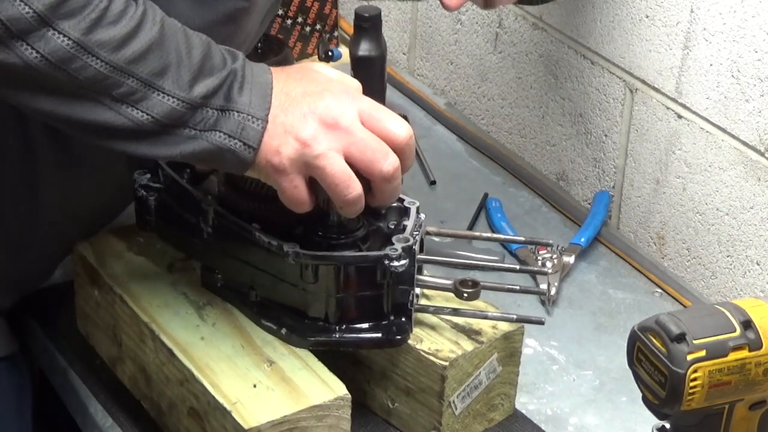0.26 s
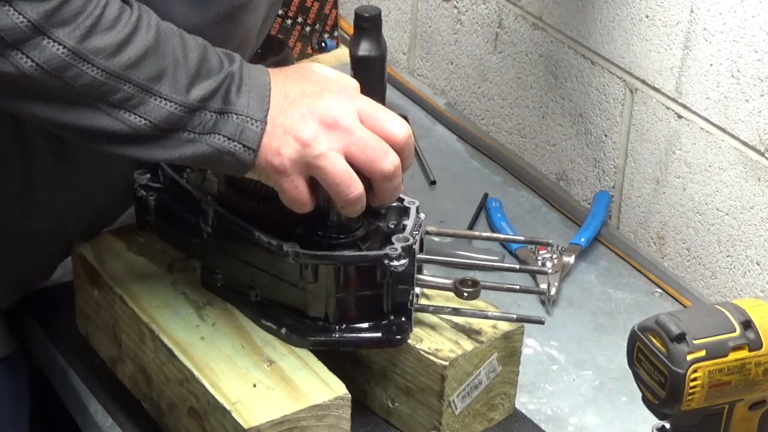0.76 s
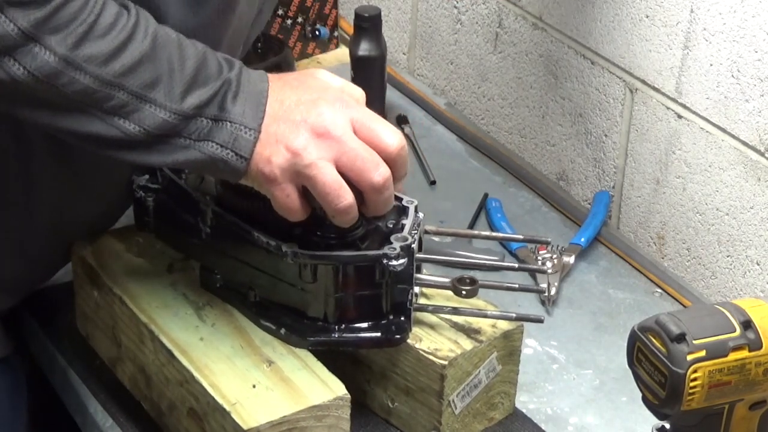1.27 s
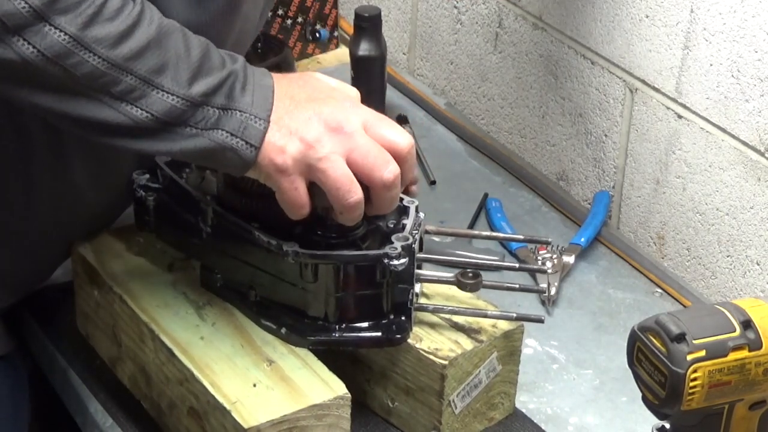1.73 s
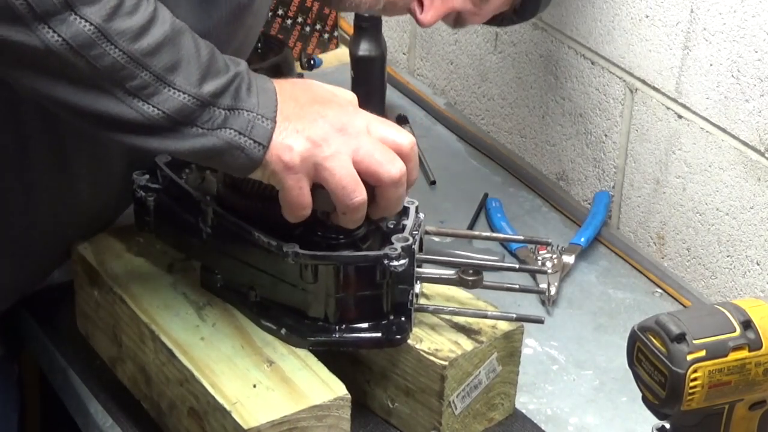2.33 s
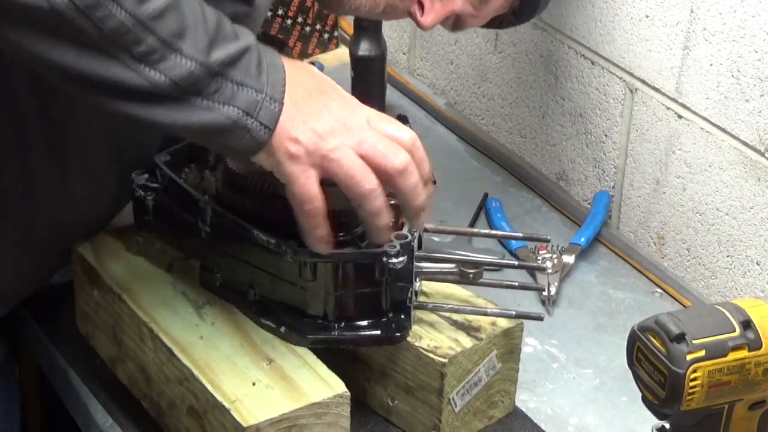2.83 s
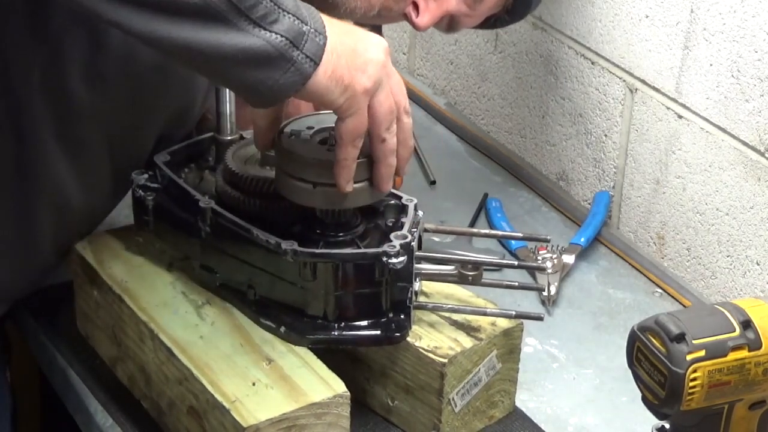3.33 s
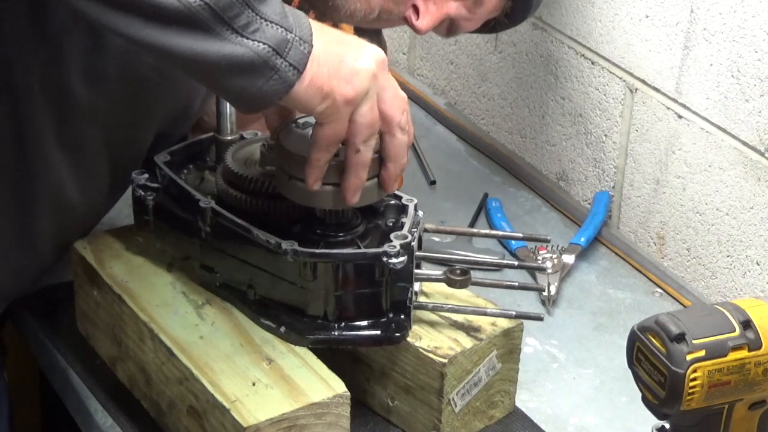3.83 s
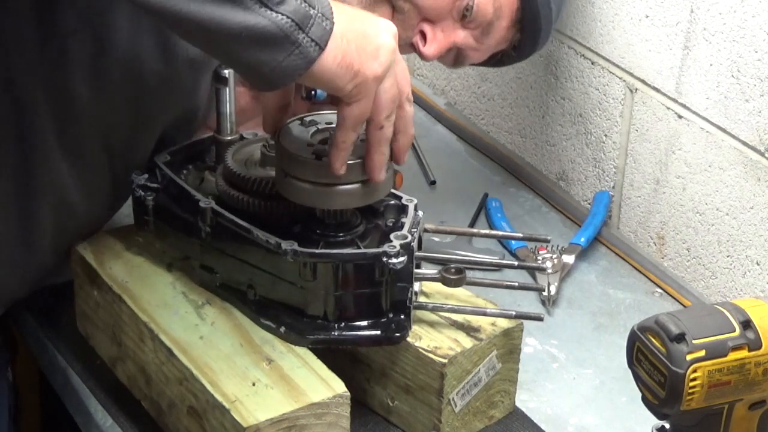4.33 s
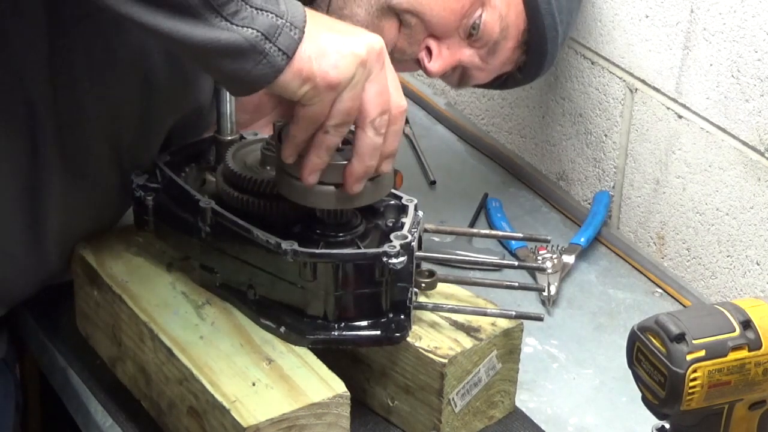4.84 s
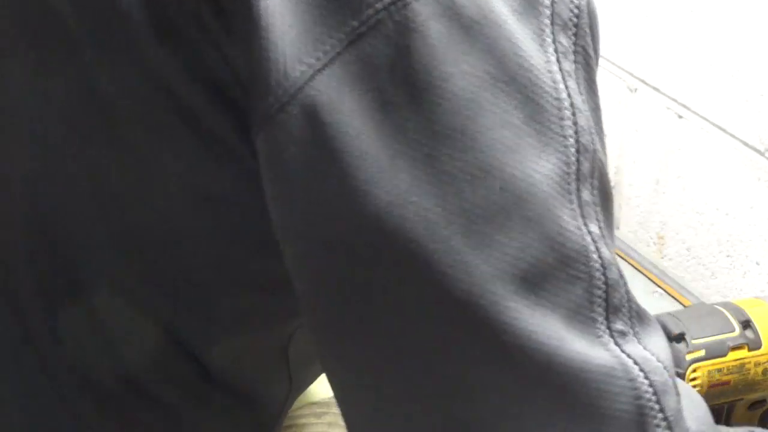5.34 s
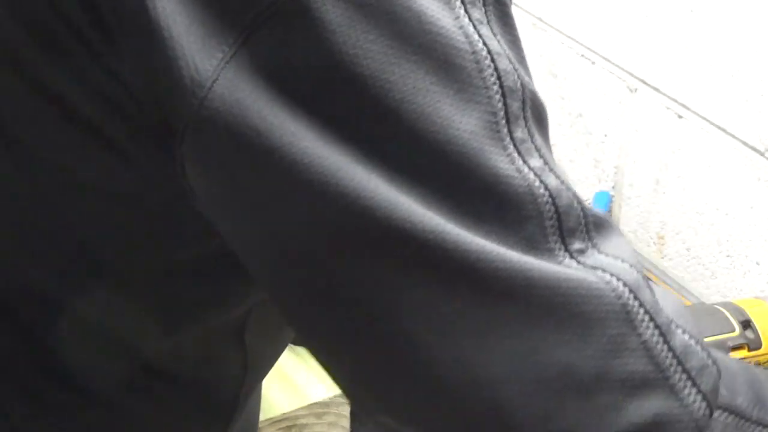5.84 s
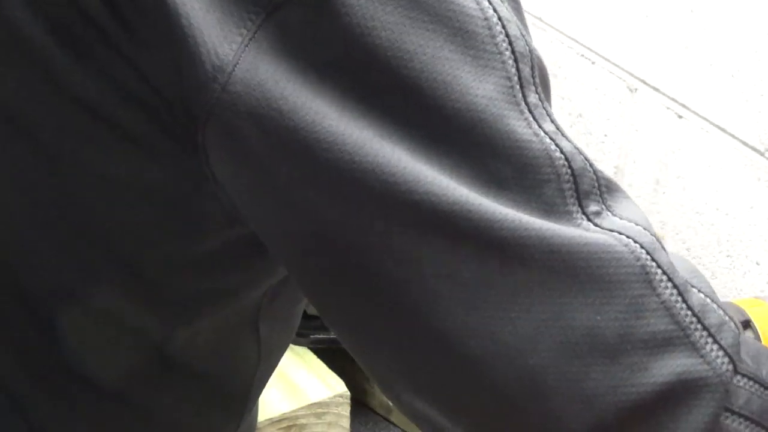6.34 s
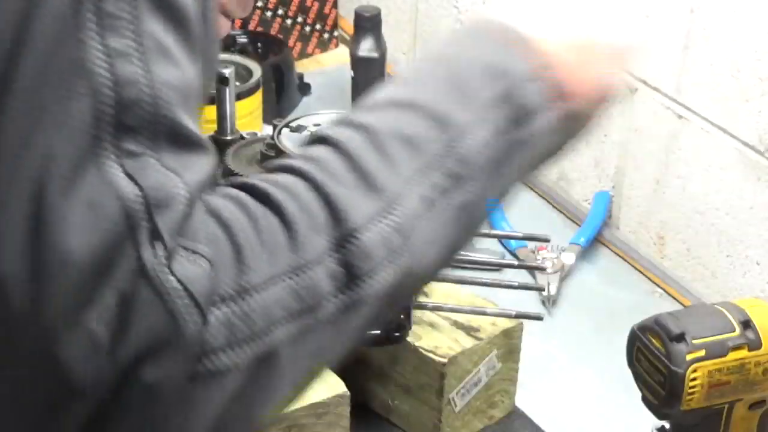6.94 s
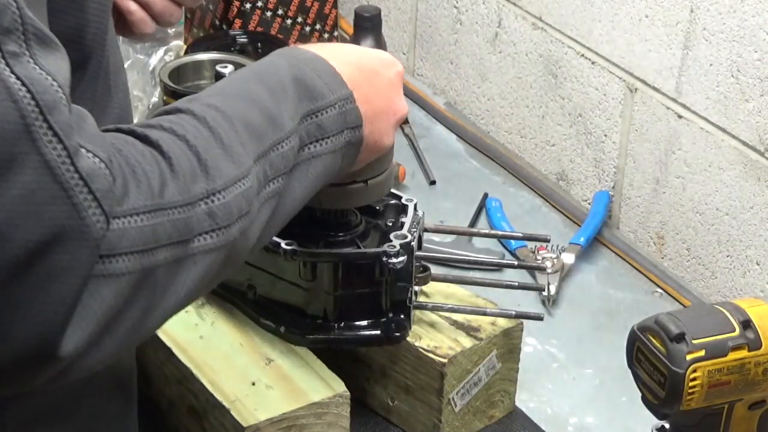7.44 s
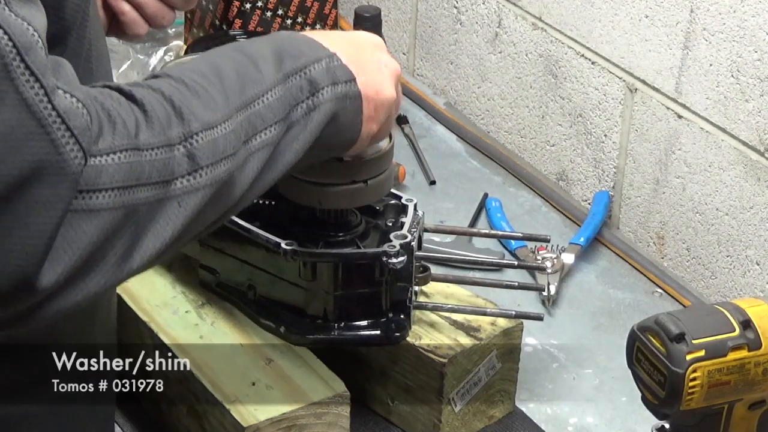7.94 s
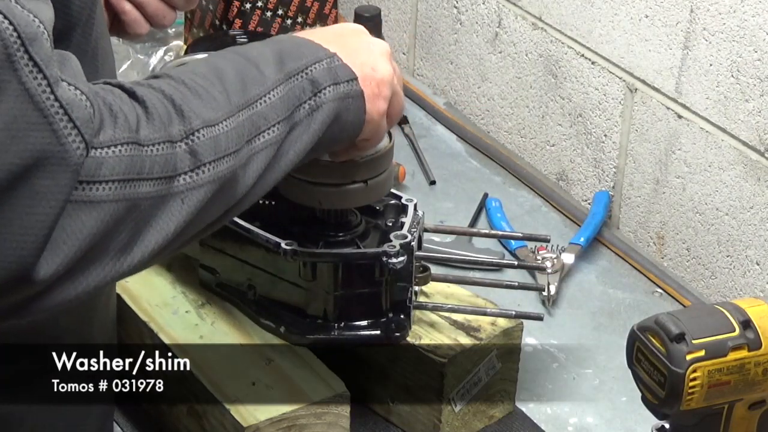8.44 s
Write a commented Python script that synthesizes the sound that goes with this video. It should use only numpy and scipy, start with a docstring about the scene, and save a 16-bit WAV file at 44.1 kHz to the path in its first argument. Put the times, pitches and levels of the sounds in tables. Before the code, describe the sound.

A hard-walled workshop, close microphone, faint room air with a thin high whine and very fast tiny ticking. At 0 s a dull wooden thud and a few metal knocks as a gear is worked on its shaft; light knocks near 0.5 and 1.0 s. At 1.33 s a loud short clank with a thud, then at 2.04 s the loudest, a rattling clank of about 0.06 s as it seats, ringing in the case. A knock at 2.9, then gritty high steel rubs until 4.6, with a tiny ping at 4.0. Cloth rustles around 4.3-5.4; a low motor hum switches on at 5.0. Parts slide and clink sharply from 5.0 to 5.5, strongest at 5.2-5.3, with more clinks at 6.0-6.1. Sleeve swishes from 6.2 to 7.9. Over the hum, a thin washer ticks at 8.0 and rings brightly around 8.45-8.5.

```python
"""A steel gear is worked onto its shaft in a small aluminium crankcase, over room air, whine and ticking.
It knocks, drops home in two loud clanks and is turned so that its teeth rub; the case thuds on wood.
Then a sleeve swings past, loose steel parts bump, a low hum sets in and parts are slid and clinked.
Last, a thin washer rings on the shaft. Metal sounds are short blows that wake many dying modes
(natural tones of the object); rubs, cloth and air are shaped noise; thuds and hum are sine waves."""
import sys
import numpy as np
from scipy import signal
from scipy.fft import rfft, irfft, next_fast_len
from scipy.io import wavfile

SR = 44100
rng = np.random.default_rng(int(sys.argv[2]) if len(sys.argv) > 2 else 0)


def waveform_to_disk(signal):
    """Save audio, clipped to [-1, 1], as 16-bit WAV at the path in sys.argv[1]."""
    frames = np.transpose(np.atleast_2d(signal))
    scaled = np.clip(frames, -1, 1) * 32767
    samples = np.round(scaled).astype(np.int16)
    wavfile.write(sys.argv[1], SR, samples)


N = 383217
TIME = np.arange(N) / SR
RING_TIME = TIME[:SR]  # one second, long enough for any ring

# In all names and tables, t60 is the time in which a sound loses 60 dB.


def from_db(db):
    """Turn decibels into a gain."""
    return 10 ** (np.asarray(db) / 20)


def rms_one(x):
    """Scale to an rms (average strength) of 1."""
    return x / np.sqrt(np.mean(x ** 2) + 1e-20)


def unit_energy(x):
    """Scale each channel to a total energy of 1."""
    return x / np.sqrt(np.sum(x ** 2, axis=-1, keepdims=True) + 1e-20)


def in_time(rows):
    """Read each column of a time table at every sample."""
    s, *columns = np.transpose(rows)
    return [np.interp(TIME, s, column) for column in columns]


def at_hz(points, hz):
    """Read a frequency table between its points, on a logarithmic frequency axis."""
    table_hz, values = np.array(points).T
    return np.interp(np.log(hz + 1e-3), np.log(table_hz), values)


def butter(x, hz, kind, order=2):
    """Filter with a Butterworth filter, which has no ripple."""
    sections = signal.butter(order, hz, kind, fs=SR, output="sos")
    return signal.sosfilt(sections, x + 1e-18)


def dying(t60):
    """Exponential fade that loses 60 dB in t60 seconds."""
    return np.exp(-np.log(1000) * RING_TIME / t60)


def convolve(x, response):
    """Let every sample of a signal set off a stereo response."""
    return signal.fftconvolve(np.atleast_2d(x), response, axes=-1)[:, :N]


def add(out, s, sound):
    """Mix a sound in at its time."""
    at = int(max(s, 0) * SR)
    out[:, at:at + sound.shape[-1]] += sound[..., :N - at]


def stroke(s, length):
    """Strength of a movement that swells and fades."""
    return np.sin(np.pi * np.clip((TIME - s) / length, 0, 1))


def stereo_noise(size, side_db):
    """White noise, partly shared by both ears and partly opposite in them."""
    mid, side = rng.standard_normal((2, size))
    return mid + from_db(side_db) * side * [[1], [-1]]


def noise(spectrum, side_db):
    """Steady stereo noise with a given spectrum, rms 1."""
    size = next_fast_len(N)
    gain = from_db(at_hz(spectrum, np.arange(size // 2 + 1) * SR / size))
    coloured = irfft(rfft(stereo_noise(size, side_db)) * gain, size)
    return rms_one(coloured[:, :N])


def crowded_modes(colour, t60s, side_db, size=SR, count=1):
    """Modes too many to tell apart act as noise; each third-octave band dies at its own rate."""
    edges = np.geomspace(70, 17000, 25)
    # two noises each, so that neighbouring bands are unrelated
    white = np.array([[stereo_noise(size, side_db) for _ in range(2)] for _ in range(count)])
    out = 0
    for k, (low, high) in enumerate(zip(edges, edges[1:])):
        hz = np.sqrt(low * high)
        fading = white[:, k % 2] * dying(at_hz(t60s, hz))[:size]
        band = butter(fading, [low, high], "band")
        out = out + unit_energy(band) * (np.sqrt(high - low) * from_db(at_hz(colour, hz)))
    return unit_energy(out)


def clear_modes(modes, vary_db=0):
    """The few modes that stand out as tones are dying sine waves, with strengths left partly to luck."""
    luck = rng.standard_normal(len(modes)) * vary_db
    tones = 0
    for k, (hz, db, t60) in enumerate(modes):
        strength = (-1) ** k * from_db(db + luck[k])
        tones = tones + strength * np.sin(2 * np.pi * hz * RING_TIME) * dying(t60)
    return unit_energy(tones)[None]


def blows(rows, colour, t60s, modes, ring_db, bass_hz, treble_hz, side_db,
          focus_db=3, vary_db=2, crack_db=0, crack_s=0.0013):
    """Each blow wakes its own crowded modes, and one of four mixes of the clear tones."""
    out = np.zeros((2, N))
    rings = [from_db(ring_db) * clear_modes(modes, vary_db)[0] for _ in range(4)]
    bodies = crowded_modes(colour, t60s, side_db, size=SR // 8, count=len(rows))
    # the instant of contact itself radiates a short crack
    crack = from_db(crack_db) * np.exp(-RING_TIME[:SR // 8] / crack_s)
    bodies = unit_energy(bodies * (1 + crack))
    for k, (row, body) in enumerate(zip(rows, bodies)):
        s, db, bass_db, treble_db, contact_hz, free_db = row
        # heavy contacts carry more bass, hard ones more treble
        bass = from_db(bass_db) * butter(body, bass_hz, "low")
        middle = butter(butter(body, bass_hz, "high"), treble_hz, "low")
        treble = from_db(treble_db) * butter(body, treble_hz, "high")
        hit = bass - middle + treble  # the minus sign lets the bands join smoothly
        # a free part rings more than a held one
        ring = from_db(free_db) * rings[k % len(rings)]
        for sound in (hit, ring):
            # the springiness of the contact favours one band
            favoured = butter(sound, [contact_hz / 1.106, contact_hz * 1.04], "band", order=1)
            add(out, s, from_db(db) * (sound + from_db(focus_db) * favoured))
    return out


def background(rumble_db=-0.56, whine_db=-20, whine_hz=7880):
    """Air and rumble are shaped noise, the whine is a sine; a motor adds hum lines in the later part."""
    # spectrum of the room air; columns: f/Hz, level per Hz/dB
    air_spectrum = [(71, -45), (120, -11), (177, -4), (200, -2), (277, -1.5), (452, -4.5), (533, -10),
                    (602, -9), (2010, -17), (2410, -18.5), (5810, -24), (8560, -24.5), (15800, -48)]
    # spectrum of the rumble without the motor; columns: f/Hz, level per Hz/dB
    bench_rumble = [(20, -6), (45, -1), (70, -4), (110, -13.5), (200, -22), (500, -39)]
    # spectrum of the rumble with the motor; columns: f/Hz, level per Hz/dB
    motor_rumble = [(20, -4.5), (28, -3), (42, -1), (58, -11.5), (85, -10.5), (125, -22), (300, -51.5)]
    # motor rumble over time, before rumble_db is added; columns: t/s, level/dB
    rumble_level = [(5.1, -35.5), (8.43, -35), (8.62, -29)]
    # tones of the motor's hum, relative to the hum level; columns: f/Hz, level/dB
    hum_lines = [(88.5, -3), (100, -11.5), (177, -21)]
    motor_on_s, motor_rise_s = 5.0, 0.019
    quiet_air_db, quiet_rumble_db = -52, -47.5
    motor_air_db, hum_db = -49, -38

    running = np.clip((TIME - motor_on_s) / motor_rise_s, 0, 1)
    hum = 0
    for hz, db in hum_lines:
        hum = hum + from_db(db) * np.sqrt(2) * np.sin(2 * np.pi * (hz * TIME + rng.random()))
    whine = from_db(whine_db) * np.sin(2 * np.pi * whine_hz * TIME)  # relative to the air
    air = noise(air_spectrum, side_db=-13) + whine + ticking()
    quiet = from_db(quiet_air_db) * air
    quiet = quiet + from_db(quiet_rumble_db) * noise(bench_rumble, side_db=-45)
    rumble_gain = from_db(in_time(rumble_level)[0] + rumble_db)
    motor = from_db(motor_air_db) * air + from_db(hum_db) * hum
    motor = motor + rumble_gain * noise(motor_rumble, side_db=-42)
    return (1 - running) * quiet + running * motor


def ticking(level_db=-13, hz=3150, length_s=0.007):
    """Tiny ticks, 30 a second, are fading bursts of noise in one band; level relative to the air."""
    since_tick = TIME % (1 / 30)
    bursts = rng.standard_normal(N) * np.exp(-since_tick / length_s)
    ticks = butter(bursts, [hz / 1.3, hz * 1.19], "band")
    return from_db(level_db) * rms_one(ticks)


def blocks(t60_s=0.1):
    """The heavy case rocks on wooden blocks: each dull thud is a low, quickly dying sine."""
    # thuds; columns: t/s, level/dB, f/Hz
    thuds = [(.001, -20.5, 145), (.151, -49, 223), (1.347, -22.5, 226), (1.359, -21.5, 137),
             (1.485, -29.5, 135), (2.885, -27, 135), (4.705, -37, 272)]
    out = np.zeros((2, N))
    for s, db, hz in thuds:
        add(out, s, from_db(db) * np.sin(2 * np.pi * hz * RING_TIME) * dying(t60_s))
    return out


def gear(level_db=19.5, knock_bass_db=1.0, knock_ring_db=-9):
    """The gear knocks and chatters down its shaft, and the whole case answers with its modes."""
    # gear knocking against shaft and case, before level_db is added;
    # columns: t/s, level/dB, hardness (more treble, less bass)/dB
    knocks = [(.029, -27, 5), (.0665, -33.5, -10), (0.102, -37, -4.5), (.159, -42.5, -10),
              (.529, -46.5, 11.5), (.974, -37.5, 4.5), (.979, -31, -3.5), (.988, -32, -1), (.998, -31, -7),
              (1.230, -46, 5), (1.679, -42.5, -12), (2.884, -32.5, -5.5), (2.917, -44, 4.5),
              (3.544, -36, -9), (4.699, -42.5, 3), (5.599, -34.5, -4.5), (6.426, -39.5, 3.5)]
    # gear chattering down its shaft until it seats, before level_db is added;
    # columns: t/s, length/s, time to seat/s, first contact level/dB, seating level/dB,
    # bass/dB, contact resonance f/Hz, ring/dB
    drops = [(1.3267, .0125, .012, -11.5, -4.5, -4, 1330, -5),
             (2.0444, .0635, 0.023, -8.5, 0, -12, 1485, -1.5)]
    # crowded short-lived modes of the case; columns: f/Hz, level per Hz/dB
    case_colour = [(60, -22), (140, -5.5), (200, -3), (330, -4), (520, 1.5), (900, -10.5), (1350, -3),
                   (2000, -4), (3300, -11.5), (6500, -9), (9500, -14.5), (12500, -34), (16000, -45)]
    # clear tones of the case; columns: f/Hz, level/dB, t60/s
    case_modes = [(345, -19, .45), (480, -14, 1), (509, -15.5, 0.82), (563, -17, 0.423), (660, -8, 0.39),
                  (1045, -11, 0.56), (1224, -10.5, 0.57), (1280, -7, 0.24), (1354, -5, 0.48),
                  (1380, -5, 0.31), (1585, -7, 0.26), (1910, -1, 0.33), (2080, -20, .3), (2370, -6, 0.44),
                  (2700, -19, 0.334), (3520, -20, 0.3), (5820, -14, 0.33), (6510, -11, 0.28),
                  (8100, -17, .3)]
    # fading of the crowded modes: (f/Hz, t60/s)
    t60s = [(150, 0.12), (600, 0.062), (1500, 0.063), (6000, 0.077), (14000, 0.04)]
    knock_hz, hardness_db_per_octave = 1950, 7

    contacts = []
    for s, db, hard in knocks:
        # a harder knock is shorter, so its contact resonance lies higher
        contact_hz = min(knock_hz * 2 ** (hard / hardness_db_per_octave), SR / 4)
        contacts.append((s, db, knock_bass_db - hard, hard, contact_hz, knock_ring_db))
    for drop in drops:
        contacts.extend(chatter(*drop))
    hits = blows(contacts, case_colour, t60s, case_modes, ring_db=-14, bass_hz=590, treble_hz=2680,
                 side_db=-27.5, focus_db=4.0, vary_db=7.0, crack_db=-14)
    return from_db(level_db) * hits


def chatter(s, length, seat_s, first_db, seat_db, bass_db, contact_hz, ring_db):
    """The contacts of one drop change steadily in level until the gear seats, then die down."""
    spacing_s, jitter_s = .008, .0007
    # the first contact is bright, later ones are duller; once seated they weaken
    first_bass_db, first_treble_db, dullest_treble_db = 0.5, 2.5, -24
    dulling_db_per_s, settling_db_per_s = 1048, 167

    ages = np.linspace(0, length, round(length / spacing_s) + 1)
    ages[1:] += jitter_s * rng.standard_normal(size=20)[1:len(ages)]
    for age in ages:
        to_go = max(1 - age / seat_s, 0)  # 1 at the first contact, 0 once seated
        settled_db = settling_db_per_s * max(age - seat_s, 0)
        db = seat_db + (first_db - seat_db) * to_go - settled_db
        treble_db = max(first_treble_db - dulling_db_per_s * age, dullest_treble_db)
        yield s + age, db, bass_db + first_bass_db * to_go, treble_db, contact_hz, ring_db


def workshop(x, wet_db, build_s=0.0045):
    """Block walls return a diffuse tail that builds up over a few milliseconds."""
    # how fast the room dies away; columns: f/Hz, t60/s
    room_t60 = [(100, 0.72), (500, 0.8), (1500, 0.64), (2500, 0.5), (4000, 0.31), (7000, 0.41),
                (14000, 0.2)]
    # tone of the tail: (f/Hz, level per Hz/dB)
    room_colour = [(100, -2), (500, 5), (900, 1.0), (1500, 2.5), (3500, -2), (8000, -3.5), (15000, 3.0)]
    tail = crowded_modes(room_colour, room_t60, side_db=-19.0)[0]
    build_up = 1 - np.exp(-RING_TIME / build_s)
    return from_db(wet_db) * convolve(x, unit_energy(tail * build_up))


def teeth():
    """Brushing steel is grainy noise that sings in a few high bands; one tooth pings as a dying sine."""
    # steel brushing on steel; columns: t/s, length/s, level/dB
    rubs = [(2.793, 0.092, -54), (3.142, .074, -53.5), (3.37, .06, -54), (3.925, 0.12, -52.5),
            (4.075, .07, -56.5), (4.19, .037, -55.5), (4.264, 0.081, -56.5), (4.425, .023, -51.5),
            (4.546, 0.019, -48.5), (5.667, 0.1, -51), (6.307, 0.071, -47.5)]
    # the single ping; entries: t/s, level/dB, f/Hz, t60/s
    ping = (4.007, -38, 7250, .07)
    # bands that sing: (f/Hz, width/Hz, level/dB)
    bands = [(5300, 220, -0.5), (6480, 360, 5.5), (8766, 370, 4), (11150, 170, -3)]

    pressure = sum(from_db(db) * stroke(s, length) for s, length, db in rubs)
    grit = rng.standard_normal(N) * rng.exponential(1, N)
    sing = 0
    for hz, width, db in bands:
        band = butter(grit, [hz - width / 2, hz + width / 2], "band", order=1)
        sing = sing + from_db(db) * band
    s, db, hz, t60 = ping
    age = np.maximum(TIME - s, 0)
    tooth = from_db(db - 60 * age / t60) * np.sin(2 * np.pi * hz * age)
    return pressure * rms_one(sing) + tooth


def sleeve():
    """Jacket cloth slides over itself as the arm moves: shaped noise that swells and fades."""
    # arm movements; columns: t/s, length/s, level/dB
    swings = [(4.3, 1.4, -55), (4.945, 0.49, -48), (6.17, 0.43, -49), (6.577, 1.32, -52)]
    # spectrum of the cloth; columns: f/Hz, level per Hz/dB
    cloth = [(150, -6), (350, 6), (900, -8), (2500, -12), (6000, -9.5), (9500, -10), (14000, -29)]
    movement = sum(from_db(db) * stroke(s, length) for s, length, db in swings)
    return movement * noise(cloth, side_db=-34.0)


def loose_parts(level_db=16.0, slide_ring_db=-9, pan_db=0.25):
    """Steel parts bump and clink; a drag is a dense run of tiny slips into the same kinds of modes."""
    # a thicker part bumping, before level_db is added;
    # columns: t/s, level/dB, bass/dB, treble/dB, contact resonance f/Hz, ring/dB
    bumps = [(4.913, -25, 14.5, -21, 2540, -8), (5.2828, -7, 0.5, -2.5, 5000, 1),
             (5.3135, -10.5, 2.5, -9.5, 6740, 6), (5.463, -12.5, 1.5, -2.5, 3200, 8),
             (6.097, -22, 5, -12, 1750, 5.5)]
    # crowded short-lived modes of the parts; columns: f/Hz, level per Hz/dB
    part_colour = [(200, -7), (1000, -11), (1800, -0.5), (3000, -1), (4500, -3.5), (8000, -0.5),
                   (10500, -11), (13000, -18), (16000, -26.5)]
    # clear tones of the light parts; columns: f/Hz, level/dB, t60/s
    part_modes = [(3800, -0.5, 0.079), (4330, 1.5, 0.063), (4470, -5, 0.068), (5680, -11, 0.085),
                  (5680, 2.5, 0.12), (6330, -15, .12), (7875, 2.5, 0.15), (10500, -6, 0.11)]
    # clear tones of the thicker part; columns: f/Hz, level/dB, t60/s
    thick_modes = [(1770, -11, 0.15), (2020, -6.5, 0.12), (2400, -18, 0.36), (2780, -4.5, 0.12),
                   (2942, 5, 0.056), (3080, 0, 0.11), (6450, -2.5, 0.086)]
    # fading of the crowded modes: (f/Hz, t60/s)
    t60s = [(500, 0.15), (2500, 0.069), (6000, 0.041), (14000, 0.067)]
    slide_start_s, slide_length_s, slide_db, slips_per_s = 5.10, .24, -44.5, 2500
    surge_s, surge_db, surge_rise_s, surge_fall_s = 5.222, -21.5, 0.02, 0.0094

    light = blows(list(clinks()), part_colour, t60s, part_modes, ring_db=1,
                  bass_hz=1500, treble_hz=4500, side_db=-18.0, focus_db=-3.5)
    thick = blows(bumps, part_colour, t60s, thick_modes, ring_db=-10.5,
                  bass_hz=1550, treble_hz=4400, side_db=-22.5, focus_db=-1.5, crack_db=0)
    # light friction, with one surge as the part catches and lets go
    slips = rng.standard_normal(N) * (rng.random(N) < slips_per_s / SR)
    rising, falling = (surge_s - TIME) / surge_rise_s, (TIME - surge_s) / surge_fall_s
    surge = np.exp(-np.maximum(rising, falling))
    force = from_db(slide_db) * stroke(slide_start_s, slide_length_s) + from_db(surge_db) * surge
    friction = force * rms_one(butter(slips, [2500, 7000], "band", order=1))
    body = crowded_modes(part_colour, t60s, side_db=-18.0)[0]
    ring = clear_modes(part_modes) + .5 * clear_modes(thick_modes)
    drag = convolve(friction, body + from_db(slide_ring_db) * ring)
    return (from_db(level_db) * (light + thick) + drag) * from_db([[-pan_db], [pan_db]])


def clinks(bass_db=-1, treble_db=3.0):
    """Light parts touch, and a touch with a higher contact resonance is brighter."""
    # light touches, before the gain of the loose parts;
    # columns: t/s, level/dB, contact resonance f/Hz, ring/dB
    touches = [(5.0226, -30.5, 5030, -18), (5.064, -36, 8200, -14), (5.105, -33, 8200, 3),
               (5.113, -19.5, 5760, 1), (5.164, -27, 4000, 6), (5.176, -21.5, 3820, 2.5),
               (5.223, -11, 4440, 0), (5.9744, -26.5, 6900, -17), (6.0024, -15.5, 8300, -1),
               (6.0433, -18, 3750, 0.5), (6.050, -17.5, 6600, -6), (6.194, -37.5, 2920, -2),
               (6.327, -41, 7900, 5)]
    middle_hz, tilt_db_per_octave = 4900, 6.5
    for s, db, hz, ring_db in touches:
        tilt_db = tilt_db_per_octave * np.log2(hz / middle_hz)
        yield s, db, bass_db - tilt_db, treble_db + tilt_db, hz, ring_db


def washer(level_db=15.0, pan_db=0.2, ring_db=7):
    """The washer ticks on the shaft tip; its split pair of ring modes beats as it dies."""
    # touches on the shaft tip, before level_db is added; columns: t/s, level/dB, ring/dB
    washer_taps = [(7.983, -24, -22), (8.0247, -22.5, 1), (8.4453, -22.5, 0), (8.464, -14, 1.5),
                   (8.510, -23.5, 8.5)]
    # crowded short-lived modes of the washer; columns: f/Hz, level per Hz/dB
    washer_colour = [(500, -15), (1800, -15), (2900, -6), (3800, -8), (4900, -5.5), (7000, -1), (8700, 1),
                     (11000, -22), (12500, -41), (16000, -40)]
    # clear tones of the washer; columns: f/Hz, level/dB, t60/s
    washer_modes = [(2830, -20, 0.043), (4780, -11, .04), (6640, -21, 0.092), (7130, -23, .12),
                    (8780, -15, .06), (10594, 0, 0.18), (10955, -9, 0.22)]
    t60s = [(2000, 0.11), (10000, 0.051)]  # fading of the crowded modes: (f/Hz, t60/s)
    contact_hz, bass_db, treble_db = 7100, 3, 2.5

    touches = [(s, db, bass_db, treble_db, contact_hz, free_db) for s, db, free_db in washer_taps]
    taps = blows(touches, washer_colour, t60s, washer_modes, ring_db, bass_hz=2000, treble_hz=6000,
                 side_db=-16, focus_db=-2.0, vary_db=0, crack_db=-10)
    return from_db(level_db) * taps * from_db([[-pan_db], [pan_db]])


def gain_control(x, threshold_db=-26.5, share=.35, recovery_db_per_s=1.63, window_s=0.021):
    """Loud sounds turn the gain down by a share of their excess; it then creeps back slowly."""
    keep = np.exp(-1 / (window_s * SR))
    power = signal.lfilter([1 - keep], [1, -keep], x.mean(axis=0) ** 2)
    level_db = 10 * np.log10(power + 1e-12)
    wanted_cut_db = share * np.maximum(level_db - threshold_db, 0)
    # the running maximum holds the deepest cut, less what has been recovered since
    recovered_db = recovery_db_per_s * TIME
    cut_db = np.maximum.accumulate(wanted_cut_db + recovered_db) - recovered_db
    return x * from_db(-cut_db)


def scene():
    """Metal sounds in the room, over thuds, cloth and background."""
    metal = gear() + teeth() + loose_parts() + washer()
    return metal + workshop(metal, wet_db=-11.0) + blocks() + sleeve() + background()


def record(dry, top=0.35, cutoff_hz=15900):
    """Stereo width is set band by band, the gain follows the level, peaks are rounded, the top is cut."""
    # gain on the left-right difference, setting stereo width in each band; columns: f/Hz, gain/dB
    stereo_width = [(25, 0), (60, -7), (125, 2), (250, -0.5), (500, 7), (1100, 11.5), (2200, 10.5),
                    (4500, 6.5), (8500, -12.5), (14000, 2)]
    size = next_fast_len(N)
    width = from_db(at_hz(stereo_width, np.arange(size // 2 + 1) * SR / size))
    side = irfft(rfft((dry[0] - dry[1]) / 2, size) * width, size)[:N]
    controlled = gain_control(dry.mean(axis=0) + side * [[1], [-1]])
    rounded = top * np.tanh(controlled / top)
    top_cut = signal.ellip(10, .1, 80, cutoff_hz, fs=SR, output="sos")
    return signal.sosfilt(top_cut, rounded)


dry = scene()
out = record(dry)
waveform_to_disk(out)
```